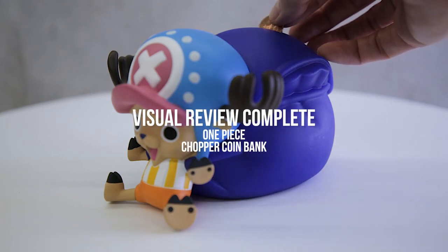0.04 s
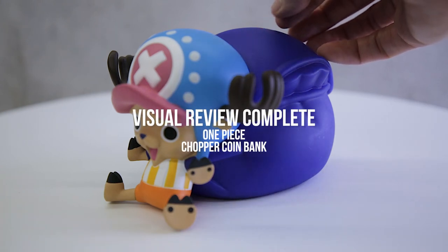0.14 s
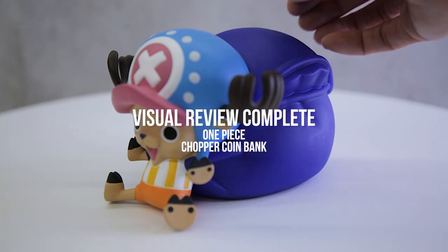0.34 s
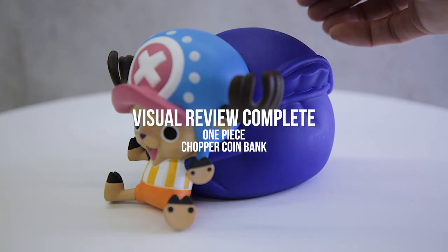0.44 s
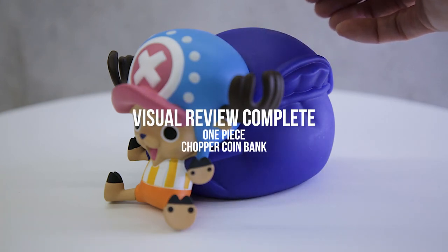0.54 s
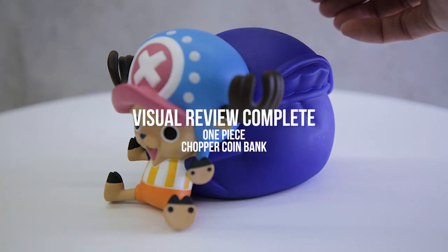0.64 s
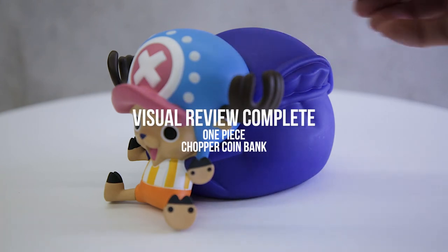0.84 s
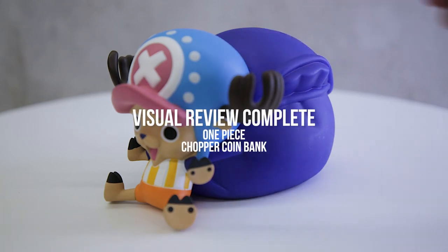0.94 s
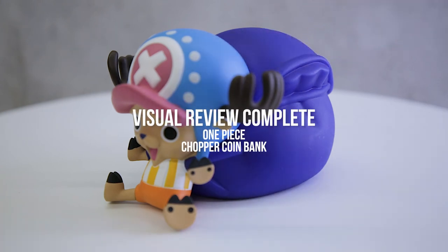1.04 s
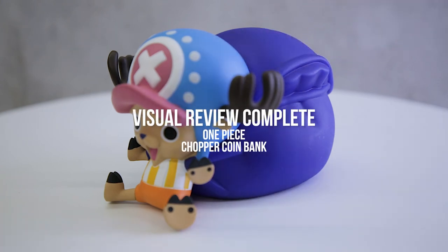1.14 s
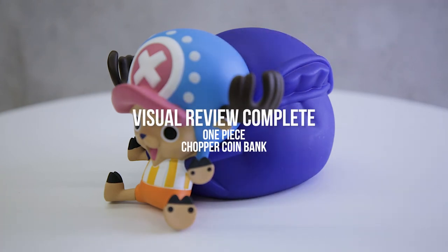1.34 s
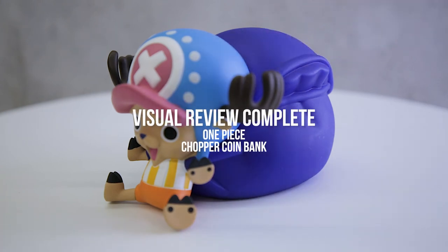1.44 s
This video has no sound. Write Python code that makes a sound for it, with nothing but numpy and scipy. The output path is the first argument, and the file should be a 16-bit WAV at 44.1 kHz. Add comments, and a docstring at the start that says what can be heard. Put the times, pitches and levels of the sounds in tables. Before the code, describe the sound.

A coin drops into a hollow plastic bank, heard close in a small room. Faint hum, thin whine and moving air come first; soft scrapes at about 0.12 and 0.18 s. At 0.24 to 0.28 s sharp clacks and a hollow thump burst out, then lighter ticks and a tiny metallic ring until about 0.39 s. A short room tail and low hollow note fade over the slowly sinking hum.

```python
"""A small room with a table, an appliance's hum, a thin whine and moving air behind, slowly growing quieter.
A coin rubs through the slot of a hollow plastic bank (swells of coloured noise), clacks on the walls and
lands with a thump (decaying modes and noise bursts), then skitters and rings briefly until it lies flat
(runs of ticks that excite modes). The room answers with a diffuse tail of decaying noise bands."""
import sys
import numpy as np
from scipy import signal
from scipy.fft import rfft, irfft
from scipy.io import wavfile

SR = 44100
rng = np.random.default_rng(int(sys.argv[2]) if len(sys.argv) > 2 else 0)


def unload_wav(signal):
    """Save mono or channel-first audio to the path in sys.argv[1] as 16-bit WAV at rate SR, clipped to [-1, 1]."""
    wavfile.write(
        sys.argv[1],
        SR,
        np.round(np.clip(np.atleast_2d(signal).T, -1, 1) * 32767).astype(np.int16),
    )


N = 66150  # samples, 1.5 s

# Mode and colour levels are relative: a gain or a normalization sets them later, unless noted.
# Background hum and whine lines, before the slow sinking: (frequency [Hz], level [dB rms])
HUM_LINES = [(59, -63), (120, -58.5), (239.9, -43.5), (360, -55.5), (479, -62), (600, -57.5), (631, -60),
             (671, -58), (710.4, -55.5), (1320, -65), (2912, -64.5), (3030.5, -60)]
# Colour of the moving air: (frequency [Hz], density [dB per Hz])
AIR_COLOUR = [(25, -7.5), (50, -7), (85, -8.5), (130, -5), (200, -5), (320, -0.5), (480, -9.5), (680, -9),
              (1100, -10), (1800, -16.5), (2700, -19), (3000, -18), (3500, -20), (8000, -23.5),
              (13000, -26.5), (15500, -30.5)]
# Reverberation bands of the room: (centre [Hz], density [dB per Hz], t60 [s])
ROOM_BANDS = [(121, -5.5, 0.48), (315, -4, 0.77), (700, -1.5, 0.38), (1850, -5, .42), (3940, -3, 0.41),
              (9300, -5, 0.36), (13600, -4, 0.28)]
# Rubs of the coin in the slot: (middle [s], half-width to 1/e [s], level [dB], tilt [dB per octave])
SLOT_RUBS = [(0.118, 0.0047, -40, -4), (0.177, .004, -41, 0), (0.19, 0.084, -51.5, 0)]
# Colour of that rubbing before its tilt: (frequency [Hz], density [dB per Hz])
RUB_COLOUR = [(300, -23), (1100, 3.5), (2200, -0.5), (3800, 1), (6000, -13), (14000, -15)]
# Low modes of the hollow body: (frequency [Hz], level [dB], t60 [s])
BODY_MODES = [(215, 2, .04), (266, -3, .11), (320, -7, .06), (452, -10, .1), (560, -8, .015),
              (706, -12, .1)]
# Ringing modes of the plastic wall: (frequency [Hz], level [dB], t60 [s])
WALL_MODES = [(1076, -3, .05), (1422, -9, .06), (1689, -6, .06), (1736, -6, .06), (1824, -3, .025),
              (1866, -10, .05), (1963, -6, .05), (2045, -8, .05), (2293, -10, .05), (2440, -2, .055),
              (2686, -9, .05), (2745, -5, .05)]
# Heavily damped modes of the struck spot, added to the wall as they are: (frequency [Hz], level [dB], t60 [s])
SPOT_MODES = [(1020, -20.5, 0.017), (1836, -15, 0.022), (2780, -25.5, 0.0085)]
# Modes of the coin: (frequency [Hz], level [dB], t60 [s])
COIN_MODES = [(7950, 4, .012), (8510, 3, .012), (9415, -9, .07), (10627, -16, .25), (13220, -7, .04),
              (13400, -7, .04)]
# Close pair of modes that the rolling rim excites: (frequency [Hz], level [dB], t60 [s])
RIM_MODES = [(13220, -29, .012), (13450, -30, .012)]
# Dense short modes of plastic and table in a thump: (frequency [Hz], density [dB per Hz])
THUD_COLOUR = [(90, -11), (200, 2), (330, -2.5), (560, -6), (800, -12), (1500, -34)]
# Dense short modes of the wall in a knock: (frequency [Hz], density [dB per Hz])
KNOCK_COLOUR = [(600, -25), (850, -12.5), (1070, -4), (1230, -3), (1420, -9), (1570, -5), (1820, 6),
                (2200, -5.5), (2700, -2.5), (3100, -21), (3500, -11.5), (6000, -40)]
# Metal on hard plastic, before the tilt of each blow: (frequency [Hz], density [dB per Hz])
CRACK_COLOUR = [(500, -10), (2000, -1), (3050, -4), (3550, 1), (4100, -1), (5150, 0.5), (5900, -7.5),
                (8000, -3.5), (10000, -9), (13500, -8.5), (15500, -23)]
# Rolls of the coin on its rim: (start [s], length [s], singing [dB], grit [dB])
RIM_ROLLS = [(0.328, .009, -1, -8), (0.345, .006, -5, -5), (0.368, .019, -8, -0.5)]
# Blows of the coin: (time [s], thump [dB], wall knock [dB], crack [dB], crack tilt [dB per octave],
# coin ring [dB])
COIN_BLOWS = [(0.238, -0.5, -1.5, 1, -0.5, -17), (0.2508, 1.5, -3.5, -5, -0.5, -13),
              (0.2526, -8.5, -3, -8.5, 4, -13), (0.254, -2.5, 2, -11, 13, -12),
              (0.259, -3.5, -29, -16, 9, -20), (0.2728, -7, -19, -8.5, 23, -17),
              (0.2745, -8.5, 6, -4.5, 1, 6), (0.2783, -4.5, -17, -8, -3.5, -3),
              (0.2799, -17.5, -9.5, -7.5, 2, -12), (0.29, -22, -22, -14, -9, -20),
              (0.2954, -13, -33, -18, 1, -12), (0.3173, -8, -24, -16, -1, -14),
              (0.3356, -13.5, -6, -18, 7, -6), (0.3419, -11, -2.5, -10.5, 6, -11),
              (0.3489, -3.5, -12, -32, 17, -21), (0.358, -16, -12, -17, -0.5, -13),
              (0.3648, -21, -17.5, -11.5, 3, 3.5), (0.3738, -13, -30, -20, 15, -16)]

AIR_DB, SINK_DB_PER_S, SINK_FROM_S = -44, 6.5, 0.32
ROOM_DB, ROOM_DELAY_S = -9, 0.005
BODY_DB, WALL_DB, COIN_DB = -24.5, -29, -35
THUD_DB, THUD_T60_S = -20.5, 0.031
KNOCK_DB, KNOCK_T60_S = -16, 0.024
CRACK_DB, CRACK_T60_S, CONTACT_S = -11.5, 0.01, 0.00038
SHELL_DB, SHELL_T60_S = -10.5, 0.057  # the crack lingering in the shell, relative to its sharp part
LANDING_S, CAVITY_HZ, CAVITY_DB, CAVITY_T60_S, CAVITY_RISE_S = 0.272, 144.7, -24.5, 0.49, 0.0022
TICKS_PER_S, TICK_SCATTER_DB = 700, 3.5
TICK_WALL_DB, TICK_CRACK_DB, TICK_RING_DB = -22, -36, -23
LOW_CUT_HZ, TOP_HZ = 135, 15700


def undb(db):
    """Decibels to gain."""
    return 10 ** (np.asarray(db) / 20)


def clock():
    """Time of every sample in s."""
    return np.arange(N) / SR


def fade(t60):
    """Exponential decay that is 60 dB down after t60 s."""
    return np.exp(-np.log(1000) * clock() / t60)


def rise(time_constant):
    """Soft onset that approaches 1 exponentially, with a time constant in s."""
    return 1 - np.exp(-clock() / time_constant)


def octaves():
    """Frequency of every spectrum bin in octaves above 1 Hz."""
    return np.log2(np.maximum(np.fft.rfftfreq(N, 1 / SR), 1))


def noise(colour, tilt_db=0):
    """Noise of rms 1 with a (Hz, dB) colour, tilted by some dB per octave."""
    hz, db = np.array(colour, float).T
    octave, points = octaves(), np.log2(hz)
    # the tilt stops at the ends of the colour table
    tilt = tilt_db * np.clip(octave, points[0], points[-1])
    gain = undb(np.interp(octave, points, db) + tilt)
    y = irfft(rfft(rng.standard_normal(N)) * gain, N)
    return y / y.std()


def ring(modes):
    """Impulse response of a table of modes: decaying sines of alternating sign."""
    response = np.zeros(N)
    for k, (hz, db, t60) in enumerate(modes):
        response += (-1) ** k * undb(db) * fade(t60) * np.sin(2 * np.pi * hz * clock())
    return response


def add(out, start, sound):
    """Mix a sound in from a given time in s."""
    i = int(np.clip(start * SR, 0, N - 1))
    out[i:] += sound[:N - i]


def through(x, response):
    """Pass a signal through an impulse response."""
    return signal.fftconvolve(x, response)[:N]


def background():
    """Appliance hum and whine as steady sines over the noise of moving air, slowly growing quieter."""
    t = clock()
    hum = np.zeros(N)
    for hz, db in HUM_LINES:
        phase = rng.random()  # in radians / 2 pi
        hum += undb(db) * np.sqrt(2) * np.sin(2 * np.pi * (hz * t + phase))
    air = undb(AIR_DB) * noise(AIR_COLOUR)
    sinking = undb(-SINK_DB_PER_S * np.maximum(t - SINK_FROM_S, 0))
    return (hum + air) * sinking


def room(x):
    """Diffuse reflections of a small room as decaying noise bands; the highest treble dies first."""
    hz, db, t60 = np.array(ROOM_BANDS).T
    octave = octaves()
    wash = rfft(rng.standard_normal(N))
    tail = np.zeros(N)
    # each row of the identity makes one band that overlaps its neighbours
    for k, peak in enumerate(np.eye(len(hz))):
        band = irfft(wash * np.interp(octave, np.log2(hz), peak), N)
        add(tail, ROOM_DELAY_S, undb(db[k]) * fade(t60[k]) * band)
    unit_tail = tail / np.sqrt(np.sum(tail ** 2))
    return undb(ROOM_DB) * through(x, unit_tail)


def slot():
    """Soft swells of scraping noise as the coin slides through the slot."""
    out = np.zeros(N)
    for middle, length, db, tilt_db in SLOT_RUBS:
        swell = np.exp(-((clock() - middle) / length) ** 2)
        out += undb(db) * noise(RUB_COLOUR, tilt_db) * swell
    return out


def cavity():
    """A low decaying note from the bank's hollow as the coin lands."""
    out = np.zeros(N)
    note = ring([(CAVITY_HZ, CAVITY_DB, CAVITY_T60_S)])
    add(out, LANDING_S, note * rise(CAVITY_RISE_S))
    return out


def thud():
    """Dense short modes of plastic and table, heard as a burst of low noise."""
    return undb(THUD_DB) * noise(THUD_COLOUR) * fade(THUD_T60_S)


def knock():
    """A cloud of short wall modes, drawn afresh at every call."""
    return undb(KNOCK_DB) * noise(KNOCK_COLOUR) * fade(KNOCK_T60_S)


def crack(tilt_db):
    """Metal on hard plastic: a sharp crack that lingers inside the shell."""
    decay = fade(CRACK_T60_S) + undb(SHELL_DB) * fade(SHELL_T60_S)
    return undb(CRACK_DB) * noise(CRACK_COLOUR, tilt_db) * rise(CONTACT_S) * decay


def skitter(wall, coin):
    """Each roll is a run of quick uneven ticks that keep the coin singing and graze the wall."""
    ticks, grit = np.zeros(N), np.zeros(N)
    for start, length, sing_db, grit_db in RIM_ROLLS:
        # 48 draws are more than the longest roll needs
        for k, (slip, size) in enumerate(rng.standard_normal(size=(48, 2))):
            after = (k + 0.3 * slip) / TICKS_PER_S
            if after < length:
                i = int((start + after) * SR)
                ticks[i] += undb(sing_db + TICK_SCATTER_DB * size)
                grit[i] += undb(grit_db + TICK_SCATTER_DB * size)
    singing = through(ticks, ring(RIM_MODES) + undb(TICK_RING_DB) * coin)
    graze = undb(TICK_WALL_DB) * (wall + knock()) + undb(TICK_CRACK_DB) * crack(0)
    return singing + through(grit, graze)


def blows(wall, coin):
    """Each blow shakes the body, knocks the wall, cracks and sets the coin ringing."""
    out = np.zeros(N)
    body = undb(BODY_DB) * ring(BODY_MODES)
    for start, thump_db, wall_db, crack_db, tilt_db, ring_db in COIN_BLOWS:
        blow = undb(thump_db) * (body + thud())
        blow += undb(wall_db) * (wall + knock())
        blow += undb(crack_db) * crack(tilt_db)
        blow += undb(ring_db) * coin
        add(out, start, blow)
    return out


def scene():
    """The coin in the small bank, high-passed to remove the bass leak of the mode onsets; room, background."""
    wall = undb(WALL_DB) * ring(WALL_MODES) + ring(SPOT_MODES)
    coin = undb(COIN_DB) * ring(COIN_MODES)
    bank = slot() + skitter(wall, coin) + blows(wall, coin)
    low_cut = signal.butter(3, LOW_CUT_HZ, "high", fs=SR, output="sos")
    bank = signal.sosfilt(low_cut, bank)
    mix = background() + room(bank) + cavity() + bank
    return mix[None]  # one channel


def record(dry):
    """Soft limit that keeps the sum below full scale, then a steep top cut."""
    top_cut = signal.ellip(10, 0.2, 90, TOP_HZ, fs=SR, output="sos")
    return signal.sosfilt(top_cut, np.tanh(dry))


dry = scene()
out = record(dry)
unload_wav(out)
```